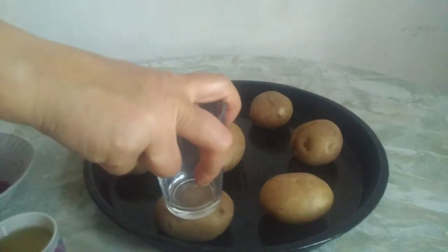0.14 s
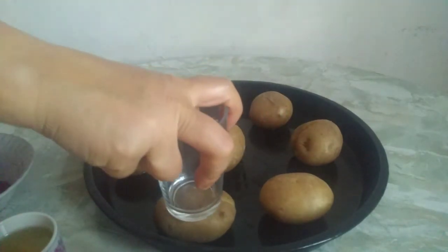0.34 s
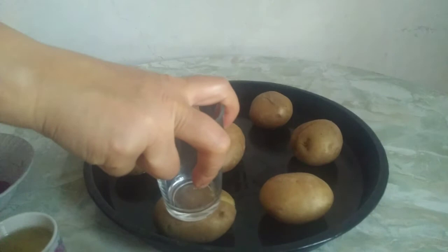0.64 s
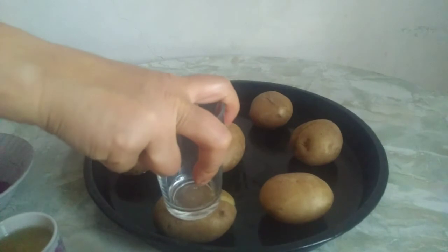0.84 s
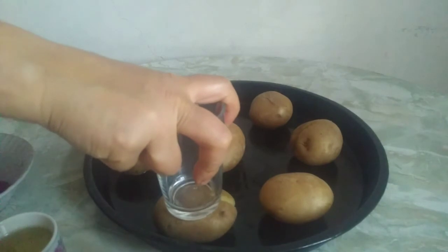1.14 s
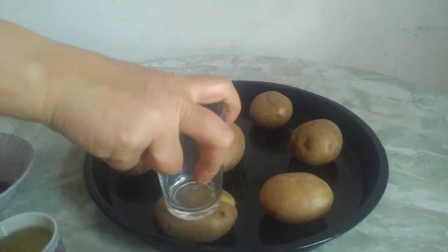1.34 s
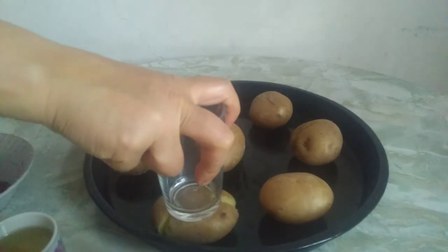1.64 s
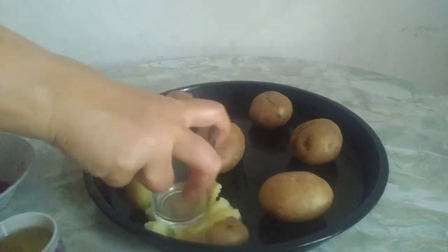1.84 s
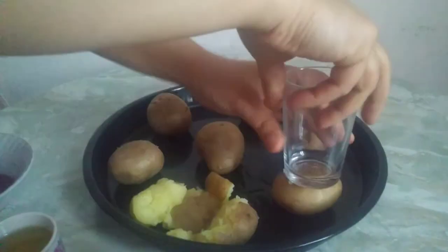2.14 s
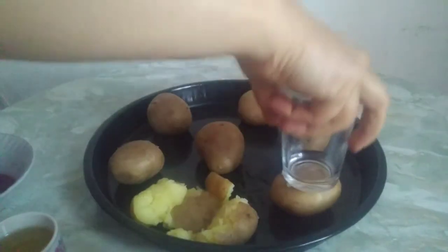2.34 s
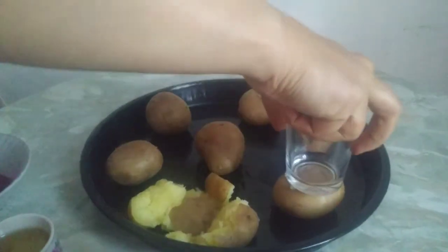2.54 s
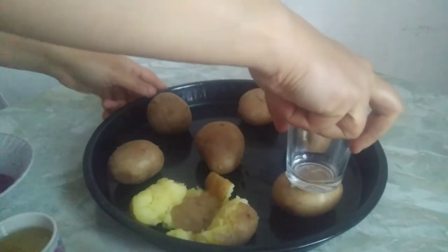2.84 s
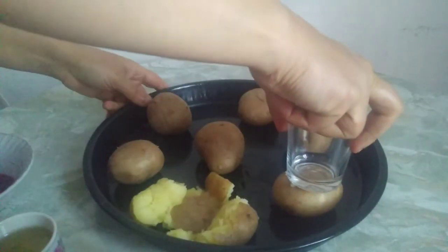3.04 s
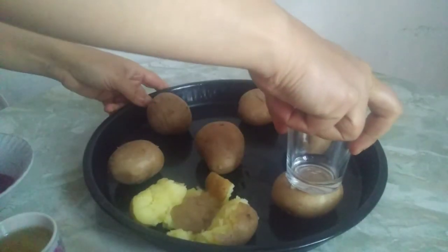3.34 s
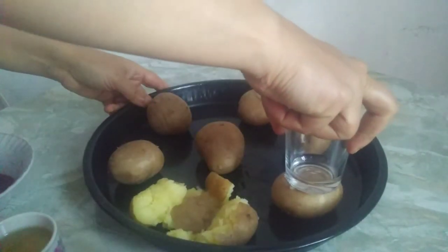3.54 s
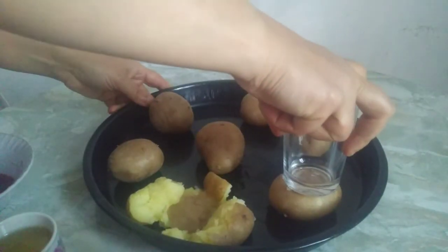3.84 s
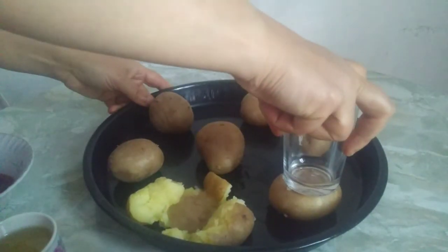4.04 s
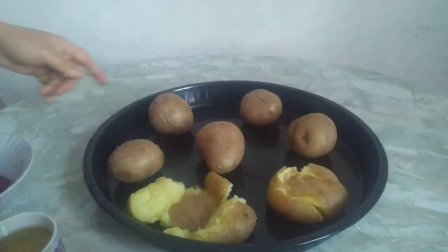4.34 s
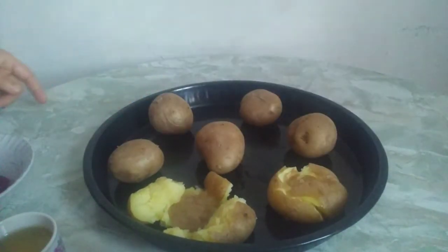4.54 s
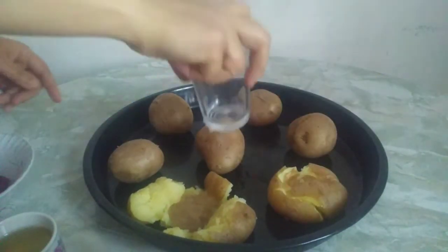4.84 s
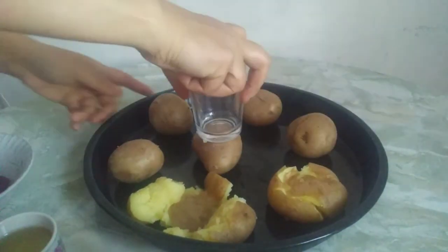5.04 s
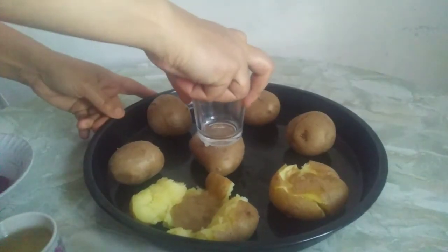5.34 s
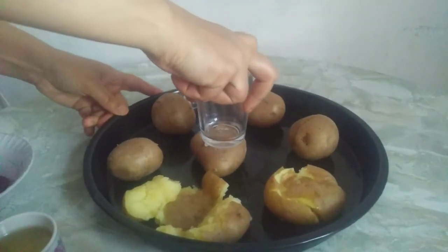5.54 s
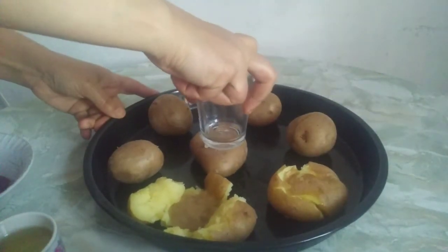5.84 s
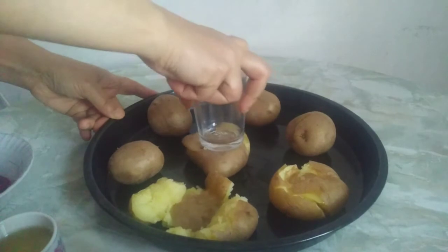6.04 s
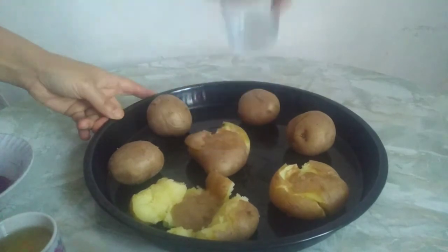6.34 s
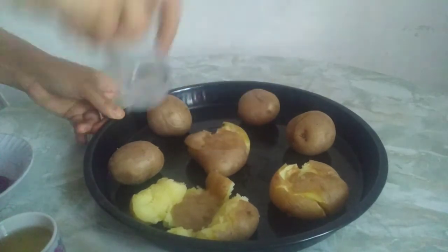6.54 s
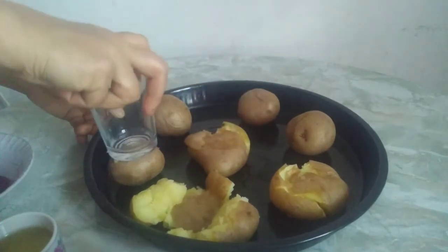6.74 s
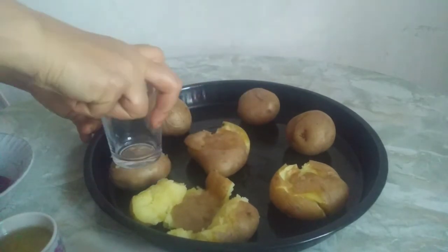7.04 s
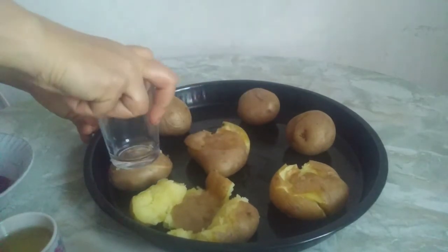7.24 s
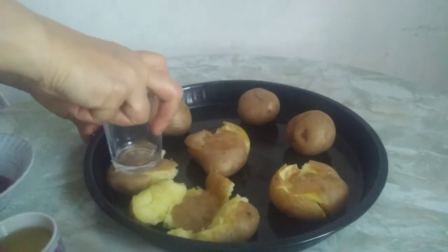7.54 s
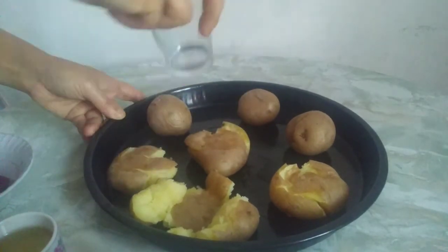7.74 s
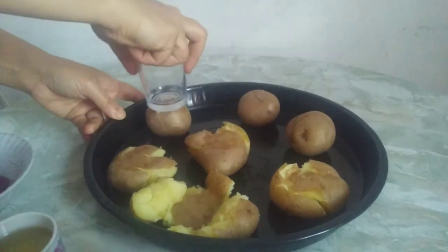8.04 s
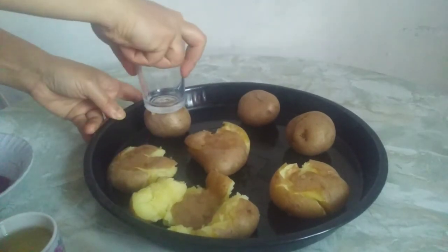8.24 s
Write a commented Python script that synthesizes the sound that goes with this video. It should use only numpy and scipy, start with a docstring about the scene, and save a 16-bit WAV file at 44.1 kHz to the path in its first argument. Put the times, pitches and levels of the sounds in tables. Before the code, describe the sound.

Wet spitting pops and soft low thuds as potatoes split on a baking tray in a small kitchen, over rumble and faint hum.

```python
"""Rumble, room tone and hiss come first, then wet pops: potatoes are crushed on a metal baking tray.
They go one after another under a drinking glass. Filtered noise makes split skins spit and pulp tear.
Sagging sines make the table thump, and decaying modes the damped tray, its knocks and its ring when freed.
Band-passed bursts click and hiss. The stereo microphone stands on the same table, in a small kitchen
with short wall reflections; a low wavering sine hums in the later part."""
import sys
import numpy as np
from scipy import signal
from scipy.fft import rfft, irfft
from scipy.io import wavfile

SR = 44100
rng = np.random.default_rng(int(sys.argv[2]) if len(sys.argv) > 2 else 0)


def dump_mix(stems):
    """Bounce the given channels to the path in sys.argv[1] as a 16-bit WAV at rate SR."""
    frames = np.atleast_2d(stems).T  # one column per channel
    limited = np.clip(frames, -1, 1)  # hard clip at full scale
    pcm = np.round(limited * 32767).astype(np.int16)
    wavfile.write(sys.argv[1], SR, pcm)


N = 369558  # length in samples
TIME = np.arange(N) / SR
AGE = TIME[:int(.7 * SR)]  # seconds since the start of one sound
CUT_S, CUT_DECAY_S = 1.861, 0.0016  # table swings and wet flows begun before are cut off abruptly here

# modes of the tray weighed down by potatoes: pitch_hz, relative level_db, t60_s before any further damping
TRAY_MODES = [(133, -3, 0.48), (158, -10, 0.11), (209, -2.5, .22), (246.8, 3, .16), (308.4, 3, 0.2),
              (358, -9, 0.11), (412, -4.5, 0.13), (480, -15.5, 0.13), (581, -19.5, 0.22),
              (733, -15.5, 0.098)]


def undb(db):
    """Decibels to gain."""
    return 10 ** (np.asarray(db) / 20)


def fade(t60):
    """Exponential decay, 60 dB down after t60 seconds."""
    return np.exp(-np.log(1000) * AGE / t60)


def curve(rows):
    """A control table of (s, value), interpolated at every sample."""
    return np.interp(TIME, *np.transpose(rows))


def colour(x, points, keep_power=True):
    """Filter by a (Hz, dB) spectrum; by default white noise keeps its power."""
    hz, db = np.transpose(points)
    bins_hz = np.arange(N // 2 + 1) * SR / N
    gain = undb(np.interp(np.log(bins_hz + 1), np.log(hz), db))
    if keep_power:
        gain = gain / np.sqrt(np.mean(gain ** 2))
    return irfft(rfft(x) * gain, N)


def add(track, s, sound):
    """Mix a sound into a track at time s."""
    i = int(s * SR)
    track[..., i:i + sound.shape[-1]] += sound[..., :N - i]


def pair(x, left_db, right_db):
    """Place a sound on the two channels."""
    return np.outer(undb([left_db, right_db]), x)


def ring(modes, scatter_db, detune):
    """Decaying modes scaled by total gain; weights and pitches vary with the spot that is struck."""
    hz, db, t60 = np.transpose(modes)
    chance = rng.standard_normal((len(hz), 2))
    gains = undb(db + scatter_db * chance[:, 0])
    pitches = hz * (1 + detune * chance[:, 1])
    waves = [g * np.sin(2 * np.pi * f * AGE) * fade(t) for f, g, t in zip(pitches, gains, t60)]
    return sum(waves) / np.sqrt(np.sum(gains ** 2))


def tick(hz, q, crack, t60):
    """A short two-channel burst of noise, peaked around one pitch, with a share of broad crack."""
    noise = rng.standard_normal((2, len(AGE)))
    spot = signal.iirpeak(hz, q, fs=SR)
    tuned = signal.lfilter(*spot, signal.lfilter(*spot, noise))
    return fade(t60) * (tuned / tuned.std() + crack * noise)


def cut_off(s, age):
    """A sound begun before CUT_S falls silent abruptly from that moment; later ones pass unchanged."""
    return np.exp(-np.maximum(s + age - CUT_S, 0) / CUT_DECAY_S) if s < CUT_S else 1


def background(hum_hz=43.6, waver_hz=1.393, hum_db=2.5, hiss_db=-85, tone_db=-70, tone_share=0.95):
    """Coloured noise makes rumble, room tone and microphone hiss; a wavering sine hums, swelling and sinking."""
    # spectra of rumble, room tone and hiss: pitch_hz, relative level_db
    rumble_spectrum = [(15, 1), (28, 12), (48, 3.5), (70, -2), (100, -9), (150, -31), (300, -65.5)]
    tone_spectrum = [(60, -3.5), (130, 1.5), (230, -1.5), (380, -6.5), (520, -12), (750, -20.5),
                     (1100, -40.5), (2500, -68)]
    hiss_spectrum = [(200, 3), (1000, -1), (2000, -3), (4000, -4), (8000, -7), (12000, -9.5), (13500, -15),
                     (16000, -20)]
    # rumble before the channel balance: time_s, level_db
    rumble_level = [(0, -48.5), (3.62, -51), (3.7, -57), (5.2, -48.5), (8.38, -48.5)]
    # extra hiss, louder at first; room tone takes tone_share of it: time_s, extra_db
    extra_air = [(0, 7), (1.3, 5), (2.58, 5.5), (2.62, 1)]
    # low hum, before hum_db and the channel balance: time_s, level_db
    hum_level = [(4.2, -57), (4.59, -52.5), (5.33, -60.5), (5.75, -63), (5.91, -51.5), (6.26, -48),
                 (6.53, -58), (7.49, -51.5), (8.04, -54.5), (8.38, -57)]

    drift = np.interp(TIME, np.arange(0, 9, .125), rng.standard_normal(72))
    hum_on = np.clip((TIME - hum_level[0][0]) / .1, 0, 1)
    hum_wave = np.sin(2 * np.pi * np.cumsum(hum_hz + waver_hz * drift) / SR)
    hum = np.sqrt(2) * hum_on * undb(hum_db + curve(hum_level)) * hum_wave

    # rumble and room tone partly agree on the two channels
    rumble_noise = rng.standard_normal((2, N)) + 0.52 * rng.standard_normal(N)
    rumble = undb([[-9], [-.5]] + curve(rumble_level)) * colour(rumble_noise, rumble_spectrum)
    tone_noise = rng.standard_normal((2, N)) + 0.39 * rng.standard_normal(N)
    tone_level = tone_db + tone_share * curve(extra_air)
    tone = undb([[-5], [-2.5]] + tone_level) * colour(tone_noise, tone_spectrum)
    hiss_level = hiss_db + curve(extra_air)
    hiss = undb([[-1.2], [.3]] + hiss_level) * colour(rng.standard_normal((2, N)), hiss_spectrum)
    return pair(hum, left_db=-4.5, right_db=1.0) + rumble + tone + hiss


def wet_noise(grain_db, clump_db=3.0, clump_hz=300):
    """Thousands of tiny bursting films a second, in uneven clumps, a few much larger than the rest."""
    grain_sizes = undb(grain_db * np.minimum(rng.exponential(size=N // 16 + 1), 4))
    size = np.repeat(grain_sizes, 16)[:N]  # one film lasts 16 samples
    clumps = rng.uniform(-1, 1, 8000)
    clumping = undb(clump_db * np.interp(TIME * clump_hz, np.arange(len(clumps)), clumps))
    grains = size * clumping * rng.standard_normal(N)
    return grains / grains.std()


def flow(s, levels_db, swell, hold, t60):
    """Start time and (spit, pulp) envelopes of one escape of juice: it swells, holds and dies away."""
    lead_s = .05  # room for the swell ahead of s
    t = AGE - lead_s
    decay = np.log(1000) * np.maximum(t - hold, 0) / t60
    envelope = np.exp(np.minimum(t, 0) / swell - decay) * cut_off(s, t)
    return s - lead_s, np.outer(undb(levels_db), envelope)


def hollow(x):
    """Narrow resonances of the hollow between glass and tray colour whatever sounds under the glass."""
    # resonances of the hollow: pitch_hz, width_hz, level_db
    resonances = [(2890, 47, -2), (3840, 36, -19), (4460, 93, -10), (4620, 50, -11), (5830, 19, -12),
                  (6200, 36, -15), (6600, 56, -7.5), (6900, 87, -4.5), (7420, 60, -4)]
    peaks = [undb(db) * signal.lfilter(*signal.iirpeak(hz, hz / width, fs=SR), x)
             for hz, width, db in resonances]
    return x + sum(peaks)


def squelches(spit_db=-2, pulp_db=-2, right_spread=1.0, pop_pulp_db=-15):
    """Splits, oozes and pops: bright spitting over duller tearing pulp, facing the left microphone."""
    # levels in the next three tables stand before spit_db and pulp_db
    # skin splitting: peak_s, spit_db, pulp_db, hold_s
    splits = [(.195, -38.5, -46.5, .004), (1.49, -47.5, -50, 0.0011), (1.834, -39.5, -46.5, 0.031),
              (3.083, -61.5, -56, 0.0042), (5.044, -80, -65.5, .006), (5.807, -46.5, -60, .001),
              (6.779, -38.5, -47, 0.014), (6.82, -46, -58, 0.0022), (6.903, -40, -47, 0.01),
              (7.296, -66.5, -61, 0.0033), (7.978, -57.5, -63, 0.0018), (8.263, -49.5, -53, 0.0009)]
    # juice oozing out under steady pressure: peak_s, spit_db, pulp_db, length_s (held at full level)
    oozes = [(1.689, -59.5, -66, 0.046), (1.773, -60.5, -80, 0.029), (5.061, -62, -74, 0.017),
             (5.42, -84.5, -88, 0.18), (5.844, -71, -72, .006), (6.763, -53, -62, 0.011),
             (7.181, -75, -79, .006), (7.32, -63.5, -84, 0.013), (8.244, -69.5, -65.5, 0.0057)]
    # single wet blisters popping: peak_s, level_db
    pops = [(0.131, -62.5), (0.3, -60.5), (.433, -57.5), (0.603, -69.5), (.648, -65), (0.861, -62),
            (.965, -71.5), (1.814, -51.5), (3.201, -65), (3.589, -61), (3.601, -62), (4.046, -67),
            (7.006, -71), (7.452, -70)]
    # spectra of spit and pulp: pitch_hz, relative level_db
    spit_spectrum = [(1200, -20.5), (3000, -10), (4500, -4), (6200, 3), (7500, -2.5), (9500, -12.5),
                     (12500, -14.5), (16000, -17)]
    pulp_spectrum = [(250, 12), (600, 0.5), (1300, 3), (2000, 3), (3000, 0.5), (4500, -2), (9000, -24.5)]
    # shadow on the right, away from the glass: pitch_hz, gain_db
    shadow = [(300, -11), (1000, -13.5), (2000, -11.5), (4000, -23), (6500, -34), (10000, -20),
              (15000, -20)]

    flows = np.zeros((2, N))
    for s, high_db, low_db, hold in splits:
        add(flows, *flow(s, [high_db, low_db], swell=0.0021, hold=hold, t60=0.1))
    for s, high_db, low_db, length in oozes:
        add(flows, *flow(s, [high_db, low_db], swell=.005, hold=length, t60=0.13))
    for s, db in pops:
        add(flows, *flow(s, [db, db + pop_pulp_db], swell=0.00058, hold=0.0006, t60=0.083))
    spit, pulp = undb(spit_db) * flows[0], undb(pulp_db) * flows[1]

    def wet():
        """One independent draw of the same spitting and tearing."""
        bright = colour(spit * wet_noise(grain_db=3.0), spit_spectrum)
        return bright + colour(pulp * wet_noise(grain_db=2.5), pulp_spectrum)

    direct, scattered = wet(), wet()
    right = colour(0.33 * direct + right_spread * scattered, shadow, keep_power=False)
    return np.array([hollow(direct), right])


def thuds(rise_s=0.0055, sag=0.13, sag_s=0.02, soft_s=0.0025, shudder=0.09, octave_db=7, pressed_t60=0.71):
    """Soft pushes swing the table, whose pitch sags as the load eases, and stir the damped tray."""
    # glass bearing down, levels before panning, pitch after the sag:
    # start_s, table_thump_db, table_pitch_hz, table_flex_db, tray_db
    pushes = [(.2, -20.5, 44.9, -26, -48.5), (.3, -44, 70, -35.5, -53.5), (1.479, -22, 46.6, -25, -48),
              (1.65, -23, 46.2, -39, -48.5), (1.679, -30, 65, -34, -46), (1.716, -26.5, 59.3, -24, -49),
              (1.78, -26, 45.5, -50, -60), (1.832, -18.5, 45.4, -31, -48), (2.345, -33, 34, -67, -82),
              (2.703, -37, 75.7, -48, -66), (3.08, -13.5, 37, -39, -39), (3.196, -49.5, 60, -49, -58),
              (4.849, -28, 61.7, -60, -78), (5.041, -25.5, 63.8, -41, -52.5), (5.345, -38.5, 61, -55, -57),
              (5.495, -47, 78.6, -48, -58.5), (5.802, -19.5, 53.9, -27, -47.5),
              (6.703, -29.5, 66.5, -42, -62.5), (6.772, -32, 63.3, -48, -59), (6.896, -20, 47.2, -32, -52),
              (7.158, -46, 61, -30, -57), (7.287, -23, 49.8, -40, -51), (7.893, -35, 70.6, -55, -64.5),
              (8.25, -16.5, 60.2, -28.5, -42)]
    swing_cycles, swing_lag_s = 14.25, .008  # swings until 60 dB down; delay after the tray
    flex_hz, flex_t60_s = 86.2, 0.25  # quicker bending of the table top, pitch after the sag

    out = np.zeros((2, N))
    band = signal.butter(4, [45, 140], "band", fs=SR, output="sos")
    tremble = signal.sosfilt(band, rng.standard_normal(N))
    tremble /= tremble.std()
    for s, thump_db, sway_hz, flex_db, tray_db in pushes:
        for db, hz, t60 in [(thump_db, sway_hz, swing_cycles / sway_hz), (flex_db, flex_hz, flex_t60_s)]:
            phase = 2 * np.pi * np.cumsum(hz * (1 + sag * np.exp(-AGE / sag_s))) / SR
            onset = 1 - np.exp(-(AGE / rise_s) ** 2)
            envelope = undb(db) * fade(t60) * onset * cut_off(s, AGE)
            shaking = shudder * np.roll(tremble, -int(s * SR))[:len(AGE)]
            swing = envelope * (np.sin(phase) + shaking)
            # the right side feels the table; the left hears mostly its faster swings
            left_db = -25 + octave_db * np.log2(hz / 55)
            add(out, s + swing_lag_s, pair(swing, left_db=left_db, right_db=-2.0))
        # one shared ringing, and one for each channel
        rings = np.array([ring(TRAY_MODES, scatter_db=5.5, detune=0.036) for _ in range(3)])
        tray_envelope = undb(tray_db) * (1 - np.exp(-AGE / soft_s)) * fade(pressed_t60)
        add(out, s, tray_envelope * (0.67 * rings[0] + 1.04 * rings[1:]))
    return out


def steam(start_s=0.31, level_db=-69, growth_s=0.21):
    """A faint airy noise band grows linearly against its decay, like steam leaving the first split."""
    out = np.zeros((2, N))
    band = tick(hz=1890, q=2.9, crack=0, t60=0.76)
    add(out, start_s, undb(level_db) * (AGE / growth_s) * band)
    return undb([[3], [-4]]) * out


def dry_clicks():
    """Short dry clicks of peaked noise: some pitched snaps, and two broad snaps at 3.661 and 4.102 s."""
    # clicks before the channel balance: start_s, level_db, pitch_hz, q
    clicks = [(1.688, -63, 2600, 4.7), (1.728, -61, 2600, 4), (3.661, -55, 890, 0.29),
              (3.946, -54.5, 2540, 4.5), (4.102, -61.5, 1400, 0.36), (5.045, -56.5, 1280, 2.2)]
    out = np.zeros((2, N))
    for s, db, hz, q in clicks:
        add(out, s, undb(db) * tick(hz=hz, q=q, crack=.15, t60=0.012))
    return undb([[-4], [0]]) * out


def knocks(knock_db=3, rattle_db=-21, tray_db=-29, low_hz=65):
    """The tray tips on the table, base then rim; the blows reach the right microphone through the wood."""
    # the tray rocking, levels before knock_db and panning: start_s, knock_db, contact_s, rim_tick_db
    rocking = [(1.858, -38, 0.0018, -54), (1.904, -29, .0021, -50.5), (3.934, -29, 0.0053, -67),
               (3.969, -43, .0012, -58), (3.986, -26, 0.0024, -49.5), (4.042, -38, 0.0034, -72),
               (4.123, -28.5, 0.0069, -69), (4.154, -29, .0028, -49.5)]
    # modes of the table top, struck directly: pitch_hz, relative level_db, t60_s
    table_modes = [(82.3, 1, 0.16), (133, -20, 0.037), (225, -1, 0.044), (342, -5, 0.015),
                   (403, -10, 0.063), (495, -25.5, 0.26), (605, -12, 0.022)]
    rebound_s, rebound_db, rim_hz = .0065, -3, 1370  # the rim lands just after the base

    body, ticks = np.zeros(N), np.zeros((2, N))
    for s, db, contact, tick_db in rocking:
        push = np.sin(np.pi * np.minimum(AGE / contact, 1)) ** 2  # a longer contact is duller
        push /= push.sum()
        for delay, blow_db in [(0, db), (rebound_s, db + rebound_db)]:
            blow = signal.fftconvolve(ring(table_modes, scatter_db=3.0, detune=.03), push)
            add(body, s + delay, undb(blow_db + knock_db) * blow)
        add(body, s, undb(db + tray_db) * ring(TRAY_MODES, scatter_db=8, detune=0.039))
        rim = tick(hz=rim_hz, q=1.18, crack=0.17, t60=.017)
        add(ticks, s + rebound_s, undb(tick_db) * rim)
        rattle = tick(hz=rim_hz, q=0.45, crack=0.13, t60=0.13)  # the sheet rattles briefly
        add(ticks, s + rebound_s, undb(tick_db + rattle_db) * rattle)
    # a light tray hardly moves the whole table
    body = signal.lfilter(*signal.butter(1, low_hz, "high", fs=SR), body)
    return pair(body, left_db=-22.5, right_db=5) + undb([[-4], [0]]) * ticks


def freed_tray(start_s=1.97, swing_db=-45.5, sheet_hz=231, touch_s=0.051, touch_t60=0.08,
               buzz_db=-54.5, buzz_top_hz=3200):
    """The glass lifts off; the sheet swings as a sine and chatters on the table once a cycle as it settles."""
    # modes of the tray springing free: pitch_hz, relative level_db, t60_s before the extra fade of a tap
    free_modes = [(810, -10, 0.097), (935, -1, 0.13), (1300, -3.5, .05), (1584, -9, .05),
                  (1710, 3.5, 0.051), (1880, -22, 0.033), (2400, -11, .05), (3180, -1, 0.033),
                  (3640, -7, 0.043), (5640, -5, 0.038)]
    settle = np.exp(-np.log(1000) * np.maximum(AGE - touch_s, 0) / touch_t60) * fade(0.9)
    swing, buzz = np.zeros((2, N))
    add(swing, start_s, undb(swing_db) * np.sin(2 * np.pi * sheet_hz * AGE) * settle)
    for cycle in range(18):
        age = (cycle + 0.35 * rng.random()) / sheet_hz
        # every tap lands on another spot of the rim, which smears the ringing
        tap = ring(free_modes, scatter_db=3, detune=0.062) * fade(0.11)
        add(buzz, start_s + age, undb(buzz_db) * settle[int(age * SR)] ** 2 * tap)
    buzz = signal.lfilter(*signal.butter(1, buzz_top_hz, fs=SR), buzz)  # the taps are soft
    return pair(swing, left_db=0.5, right_db=-5.5) + pair(buzz, left_db=3.5, right_db=-11)


def kitchen(x, t60=0.29, wet_db=-26, gap_s=0.0052):
    """Faint, short reflections from the walls: convolution with decaying noise that builds up over gap_s."""
    tail = rng.standard_normal((2, len(AGE))) * fade(t60) * (1 - np.exp(-AGE / gap_s))
    tail /= np.sqrt(np.sum(tail ** 2, axis=1, keepdims=True))
    return undb(wet_db) * signal.fftconvolve(x, tail, axes=1)[:, :N]


def scene():
    """All the sounds of the crushing, with their reflections, over the kitchen background."""
    work = squelches() + thuds() + steam() + dry_clicks() + knocks() + freed_tray()
    return background() + work + kitchen(work)


def record(dry, top_hz=15800):
    """The recorder cuts the top with a steep low-pass."""
    return signal.sosfilt(signal.ellip(8, .2, 70, top_hz, fs=SR, output="sos"), dry)


dry = scene()
out = record(dry)
dump_mix(out)
```